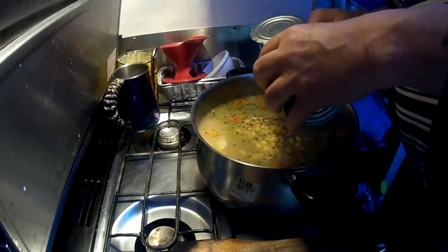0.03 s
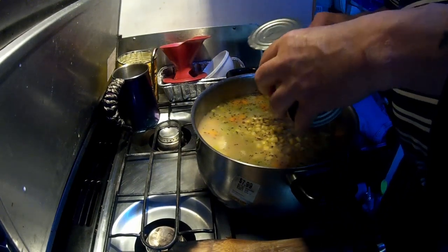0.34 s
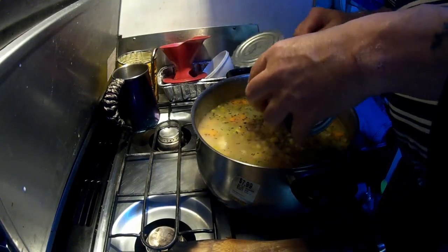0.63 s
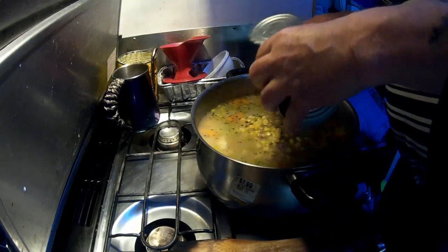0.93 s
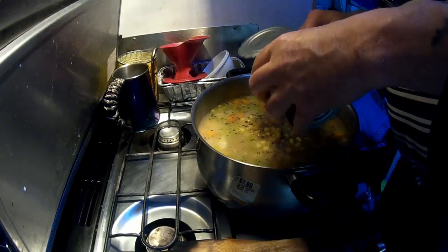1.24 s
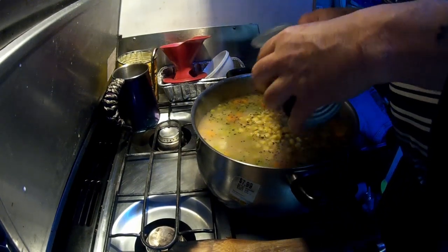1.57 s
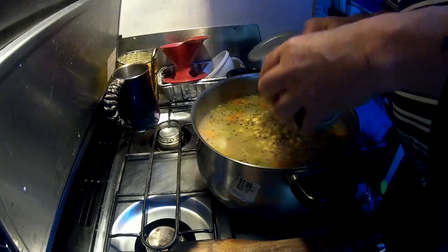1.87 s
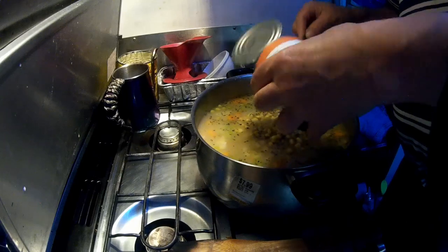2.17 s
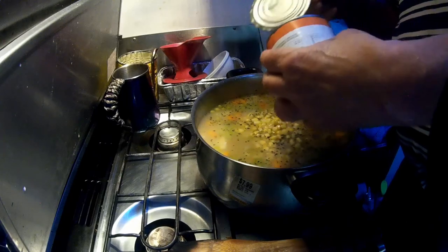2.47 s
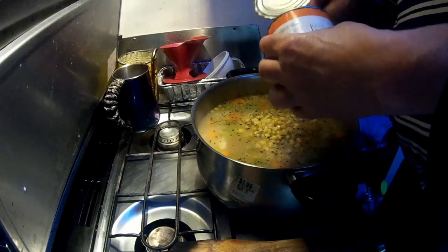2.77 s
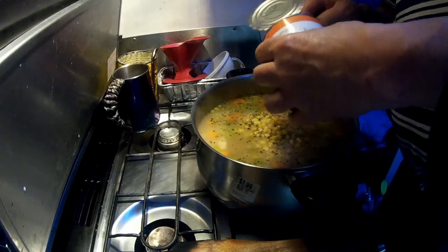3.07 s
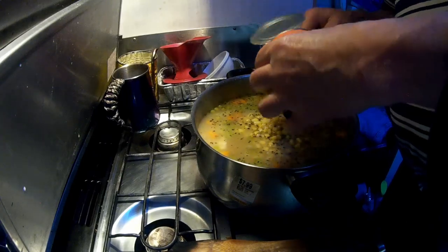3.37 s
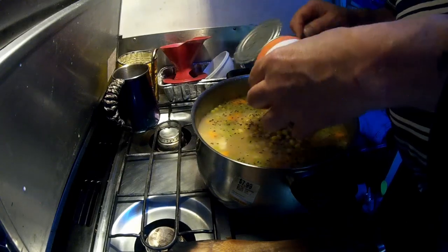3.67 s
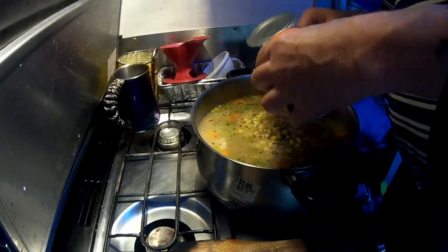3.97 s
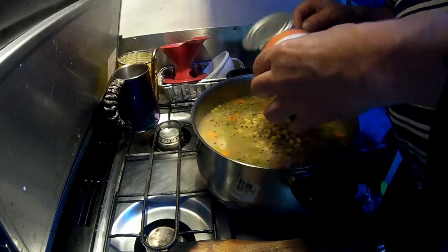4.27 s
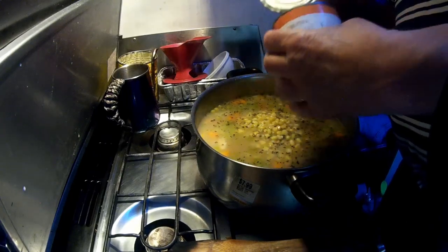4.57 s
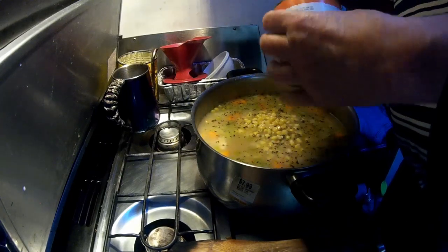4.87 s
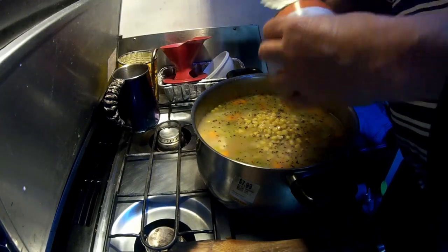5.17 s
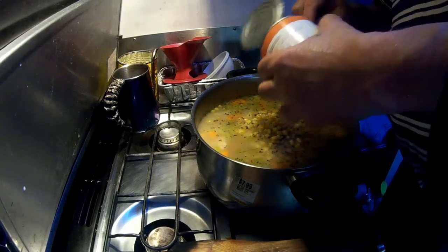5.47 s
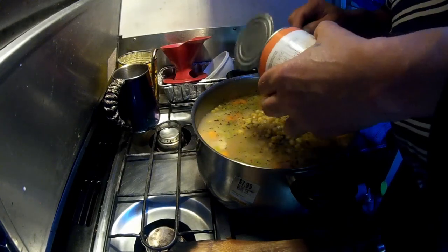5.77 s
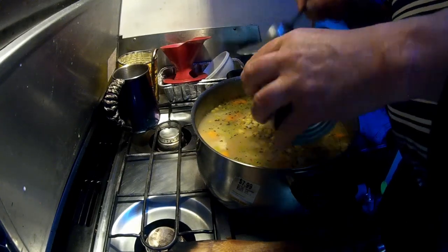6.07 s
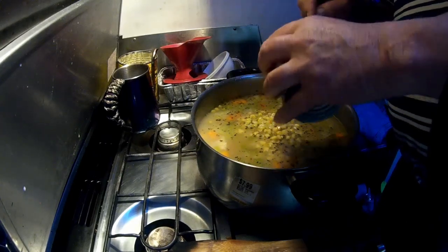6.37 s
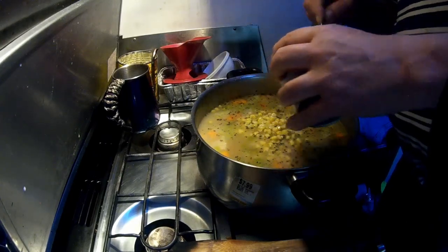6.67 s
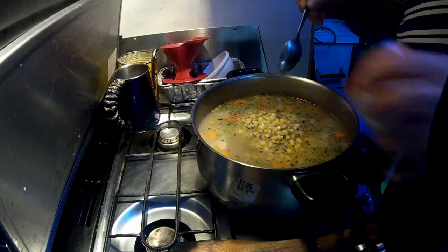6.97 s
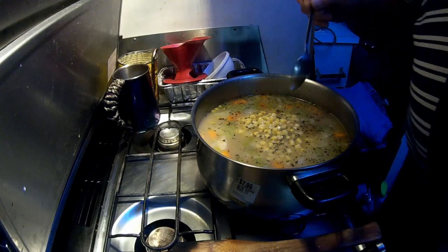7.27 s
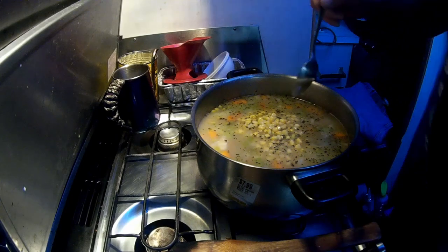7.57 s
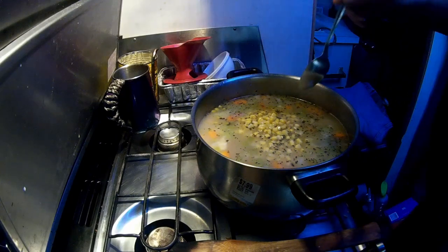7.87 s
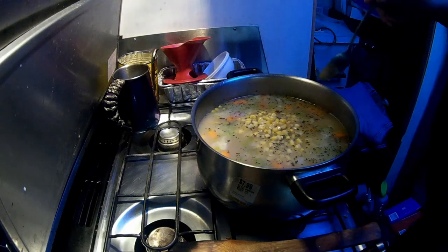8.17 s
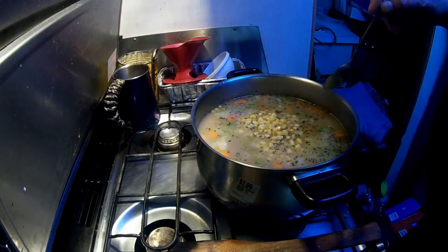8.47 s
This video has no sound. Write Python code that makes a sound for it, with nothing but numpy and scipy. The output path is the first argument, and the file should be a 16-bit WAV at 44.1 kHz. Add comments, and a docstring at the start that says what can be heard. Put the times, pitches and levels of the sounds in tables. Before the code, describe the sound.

A spoon knocks and scrapes inside a tin can over a steel pot, with hollow clacks, brief rings and a low gas burner rumble.

```python
"""A spoon knocks and scrapes in a tin can being emptied over a steel pot of soup in a small kitchen.
The air in the can answers with a short hollow note, lower once the can is empty; the tin clacks and
squeaks, and the pot rings briefly where the can taps or rubs its rim. Heard from one microphone close
to the pot, with a short wash off the near walls and the gas burner rumbling underneath."""
import sys
import numpy as np
from scipy import signal
from scipy.fft import rfft, irfft
from scipy.io import wavfile

SR = 44100
rng = np.random.default_rng(int(sys.argv[2]) if len(sys.argv) > 2 else 0)


def generate_wav(sig):
    """Save sig (samples, or channels by samples) to the path in sys.argv[1] as 16-bit PCM at SR."""
    pcm = np.round(np.clip(np.atleast_2d(sig).T, -1, 1) * 32767).astype(np.int16)
    wavfile.write(sys.argv[1], SR, pcm)


N = 375291
EMPTIED_S = 6.35  # from here on the can is empty and lifted off the rim
SCATTER_DB = 1.2  # spread of mode strength from blow to blow

# Spoon on can and can on pot, close to the microphone:
# (time [s], hollow note peak [dB], note pitch [Hz], clack [dB], rasp [dB], rim strength [dB])
CAN_KNOCKS = [(0.118, -28, 600, -46.5, -40.5, -48.5), (0.163, -32, 576, -52, -54, -56),
              (0.187, -13.5, 697, -29, -48, -74), (0.219, -30, 645, -52, -53, -75),
              (0.276, -38.5, 643, -51, -55.5, -87), (0.584, -35, 595, -43, -57, -49.5),
              (0.855, -17, 613, -36, -38.5, -46), (0.97, -12, 690, -31.5, -55, -58),
              (1.539, -21.5, 618, -41, -40, -46.5), (1.598, -27.5, 636, -48, -58, -47),
              (1.64, -9, 664, -31, -43, -72), (1.682, -23, 630, -50, -50.5, -59),
              (1.893, -29, 600, -53, -51, -42.5), (1.931, -29, 581, -47, -62, -48),
              (1.975, -25, 675, -49, -53, -54), (2.004, -23, 625, -38.5, -49.5, -38),
              (2.75, -39, 630, -62, -41.5, -43), (2.788, -16.5, 735, -37, -41.5, -49),
              (2.81, -26.5, 647, -56, -64, -46), (2.824, -42, 600, -42, -49, -39),
              (3.02, -16.5, 756, -33.5, -45, -77), (3.15, -37, 680, -44, -59, -58),
              (3.18, -33, 620, -50, -52, -79), (3.305, -21, 650, -40, -45, -52),
              (3.309, -12.5, 695, -29, -59, -47), (3.36, -33, 610, -58, -64, -43),
              (3.439, -34.5, 630, -57, -48, -51), (3.574, -29.5, 585, -40, -57.5, -49),
              (3.632, -25.5, 635, -61, -74, -51), (3.673, -27.5, 634, -37.5, -49.5, -45),
              (3.871, -15.5, 628, -44, -36.5, -39), (3.929, -31, 650, -54, -76, -78),
              (3.995, -23, 630, -42.5, -50.5, -59), (4.121, -39, 634, -53, -42, -52),
              (4.131, -27, 613, -47, -40.5, -43), (5.044, -13.5, 618, -29.5, -43.5, -63),
              (5.246, -35.5, 700, -46, -45, -36.5), (5.532, -29, 602, -58, -52, -46),
              (5.599, -30.5, 576, -39.5, -54, -54), (5.627, -27, 592, -38.5, -55, -50),
              (6.299, -17, 664, -33, -35, -42), (6.366, -25.5, 600, -39, -48, -45),
              (6.489, -30.5, 502, -48.5, -68, -54), (6.622, -15.5, 502, -33.5, -42.5, -45),
              (6.675, -23, 547, -43.5, -51, -66), (6.745, -27.5, 565, -60, -57, -51),
              (7.133, -61, 680, -51, -68, -73), (7.877, -11, 506, -33, -42, -74),
              (7.989, -31, 530, -46, -55, -62), (8.454, -44.5, 667, -48, -58, -56)]
def knocks(note_swell_s=0.003, crunch_s=0.0063, chatter_db=-22, chatter_s=0.03):
    """A sharp touch and a few ms of crunch sound the air in the can, the tin and the pot."""
    out, t = np.zeros(N), clock(.1)
    for s, note_db, hz, clack_db, rasp_db, rim_db in CAN_KNOCKS:
        emptied = s > EMPTIED_S
        envelope = np.exp(-(t / crunch_s) ** 2) + from_db(chatter_db) * np.exp(-t / chatter_s)
        force = rng.standard_normal(len(t)) * envelope
        force[0] += 6.3  # the first touch
        tick_db = rasp_db - (16 if emptied else 12)
        add(out, s, from_db(note_db) * damped_note(hz, note_swell_s))
        add(out, s, tin(force, (clack_db, rasp_db, tick_db), contact_samples=353))
        add(out, s, pot_ring(note_db, rim_db, emptied))
    return out


def thuds(swell_s=0.0031, jolt_hz=280, heavy_db=-12.5, full_db=-25, empty_db=-16):
    """Heavy knocks jolt the whole can, more so when empty; the hand damps it within a cycle or two."""
    out = np.zeros(N)
    for s, note_db, *_ in CAN_KNOCKS:
        jolt_db = note_db + min(note_db - heavy_db, 0) + (full_db if s < EMPTIED_S else empty_db)
        add(out, s, from_db(jolt_db) * damped_note(jolt_hz, swell_s))
    return out


# Short-lived resonances of the tin: (frequency [Hz], width [Hz], relative level [dB])
TIN_MODES = [(798.5, 32.8, 28), (978, 58, 14), (1115, 79, 11), (1423, 94, 8.5), (1583, 69, 3.5),
             (1934, 69, -5.5), (2016, 31, -1), (2387, 115, -8), (2455, 45, -4.5), (2730, 88, -0.5),
             (2965, 84, -6), (3457, 130, -8.5), (3680, 61, -12), (4406, 24, -14.5), (4570, 50, -25),
             (5390, 220, -20.5), (5780, 400, -18), (7180, 310, -16), (7850, 93, -16), (9900, 2200, -40.5),
             (13300, 10500, -41.5)]
# The tin's clack, rasp and tick bands: (low edge [Hz], high edge [Hz])
TIN_BANDS = [(850, 1900), (1900, 4500), (4500, 15500)]
def tin(force, band_levels_db, contact_samples):
    """A contact rings the tin, a little differently at each spot; its kind sets each band's level."""
    body = sum((-1) ** k * from_db(db + SCATTER_DB * rng.normal()) * resonate(force, hz, width)
               for k, (hz, width, db) in enumerate(TIN_MODES))
    parts = [(-1) ** k * band(body, edges) for k, edges in enumerate(TIN_BANDS)]
    return sum(from_db(db) * part / rms(part[:contact_samples])
               for part, db in zip(parts, band_levels_db))


# Blows that leave the can's wall free to ring: (time [s], level [dB], tilt [dB/octave])
WALL_BLOWS = [(1.642, -19.5, 0), (3.0195, -18, -2.5), (5.047, -16, -5.5), (6.301, -22, -11)]
# Modes of the can's wall: (frequency [Hz], relative level [dB], t60 [s])
WALL_MODES = [(682, -0.5, 0.033), (642, -4.5, 0.16), (1380, -1.5, .06), (2237, 0, 0.042), (2370, -13, 0.1),
              (2900, -30, .07), (3490, -30.5, 0.13)]
def clangs(rise_s=0.002, snap_db=-33, snap_s=0.0031, snap_hz=8000):
    """A hard edge snaps, and the can's wall swings up and rings on after the clean rebound."""
    out, t = np.zeros(N), clock(.5)
    rise = 1 - np.exp(-(t / rise_s) ** 2)
    for s, db, tilt_db in WALL_BLOWS:
        add(out, s, from_db(db) * struck(WALL_MODES, tilt_db) * rise)
        snap = rng.standard_normal(len(t)) * np.exp(-t / snap_s)
        add(out, s, from_db(db + snap_db) * band(snap, snap_hz, "high"))
    return out


# Spoon strokes inside the can: (start [s], end [s], hollow note [dB], rasp [dB], swell [dB])
SPOON_STROKES = [(0.131, 0.253, -49, -63, 7), (0.429, 0.53, -47, -59, 17), (0.58, 0.638, -47, -64, -1),
                 (0.867, 0.969, -41.5, -55, 16), (0.986, 1.065, -44.5, -68, 0),
                 (1.237, 1.339, -41.5, -57.5, 1), (1.547, 1.661, -35.5, -52, 23),
                 (1.809, 1.872, -37.5, -56, 23), (1.868, 1.946, -39, -52, -1), (1.955, 1.996, -35, -56, 7),
                 (2.759, 2.885, -54, -61, 6), (3.151, 3.201, -45.5, -58.5, -8),
                 (3.342, 3.372, -37, -59, -6), (3.442, 3.524, -45.5, -61.5, -3),
                 (3.549, 3.629, -38, -61, 10.5), (3.879, 3.911, -47, -55, 6), (4.08, 4.135, -40, -53, 8),
                 (4.137, 4.162, -26.5, -48.5, -4), (4.162, 4.234, -42.5, -68, 2),
                 (4.97, 5.041, -34.5, -54, 5), (5.251, 5.337, -51, -60.5, 8),
                 (5.445, 5.561, -40.5, -57.5, 19), (5.609, 5.636, -46, -61, -9),
                 (6.298, 6.365, -34, -47, -19), (6.356, 6.399, -34, -48.5, -14),
                 (6.393, 6.448, -40.5, -78, -7), (6.481, 6.537, -36.5, -67, 4),
                 (6.629, 6.673, -37.5, -59, -23), (6.723, 6.777, -38, -65, -1),
                 (7.906, 8.007, -42.5, -54, 10), (8.107, 8.167, -51.5, -78, 6)]
# Note of the air in the can, dropping as the last food slides out: (time [s], pitch [Hz])
AIR_PITCH = [(0, 607), (2, 619), (4.2, 639), (5.6, 623), (6.33, 640), (6.42, 520), (8.2, 538)]
def scrapes(slips_per_s=700, slip_spread_db=5.0, hiss=0.12, edge_s=0.0056,
            catch_db=1.0, catch_hz=70, air_width_hz=125, steadiness=0.61):
    """Metal drags on metal, bearing down or easing off: slips tick in the tin and keep its air humming."""
    out, t = np.zeros(N), clock(.25)
    for start, end, note_db, rasp_db, swell_db in SPOON_STROKES:
        length = end - start
        samples = int(length * SR)
        contact = np.clip(np.minimum(t, length - t) / edge_s, 0, 1)
        push = from_db(swell_db * np.minimum(t / length, 1))
        slipping = rng.random(len(t)) < slips_per_s / SR
        slips = slipping * from_db(slip_spread_db * np.minimum(rng.exponential(1, len(t)), 3))
        friction = slips * rng.choice([-1, 1], len(t)) + hiss * rng.standard_normal(len(t))
        # the edge catches and lets go, so the grit comes in clumps
        catches = band(rng.standard_normal(SR // 2), catch_hz, "low")[-len(t):]
        grit = friction * from_db(catch_db * catches / rms(catches))
        hz = np.interp(start + length / 2, *np.transpose(AIR_PITCH))
        air = resonate(resonate(grit, hz, air_width_hz), hz, air_width_hz)
        # steady pressure evens out the beating of the note
        beating = np.abs(signal.hilbert(air)) + rms(air) / 10
        air = contact * push * air / beating ** steadiness
        add(out, start, from_db(note_db) * air / rms(air[:samples]))
        clack_db = 0.4 * note_db + 0.6 * rasp_db - 0.5
        tick_db = rasp_db - 19
        add(out, start, tin(contact * push ** 0.87 * grit, (clack_db, rasp_db, tick_db), samples))
    return out


# Short metal tones, squeaks of the tin and a brief ring of the pot:
# (start [s], end [s], start pitch [Hz], end pitch [Hz], level [dB])
METAL_TONES = [(0.942, 0.976, 2900, 2950, -55), (.975, 1.001, 826, 924, -32.5),
               (1.013, 1.029, 2460, 2230, -48), (2.788, 2.802, 1126, 1080, -27),
               (2.792, 2.816, 2440, 2220, -39), (3.018, 3.031, 1408, 1414, -26.5),
               (3.311, 3.324, 1042, 910, -24), (3.316, 3.351, 2470, 2140, -47.5),
               (3.354, 3.399, 2130, 2130, -47), (4.148, 4.217, 2650, 2660, -57),
               (5.043, 5.051, 2130, 2220, -25.5), (5.046, 5.056, 846, 710, -20.5),
               (6.62, 6.64, 3410, 3420, -49)]
def metal_tones(waver=0.014, waver_hz=260):
    """The tin squeaks or the pot rings for a moment: a wavering tone that glides or holds its pitch."""
    out = np.zeros(N)
    for start, end, from_hz, to_hz, db in METAL_TONES:
        samples = len(clock(end - start))
        wobble = band(rng.standard_normal(SR // 2), waver_hz, "low")
        pitch = np.linspace(from_hz, to_hz, samples) * (1 + waver * wobble[-samples:] / rms(wobble))
        tone = np.sin(2 * np.pi * np.cumsum(pitch) / SR)
        add(out, start, from_db(db) * signal.windows.tukey(samples, .5) * tone)
    return out


# The pot just under the can, two families of modes set off at different places on its rim:
# (frequency [Hz], relative level [dB], t60 [s])
POT_LOW_MODES = [(634, 2.5, 0.15), (965.5, -1, 0.23), (1023, -16, 0.36)]
POT_HIGH_MODES = [(1430, -1, 0.22), (1670, -39, 0.49), (2070, -27.5, 0.15), (2500, -16.5, .2),
                  (2570, -23.5, 0.17), (3720, -25, 0.13)]
def pot_ring(note_db, rim_db, lifted, lifted_db=-20, gain_db=1.5):
    """One knock rings the steel pot; the low modes are much weaker once the can is off the rim."""
    low_db = -16 + 0.32 * note_db + 0.38 * rim_db + lifted_db * lifted
    ring = from_db(low_db) * struck(POT_LOW_MODES) + from_db(rim_db) * struck(POT_HIGH_MODES)
    return from_db(gain_db) * ring


# The can's edge rubbing along the pot's rim: (start [s], end [s], level [dB])
RIM_RUBS = [(2.75, 2.8, -39.5), (2.828, 2.869, -62), (3.335, 3.375, -47), (5.247, 5.343, -51.5)]
def rubs(pressed_width_hz=30):
    """Friction feeds the pot's upper modes while the pressing edge damps them."""
    out, t = np.zeros(N), clock(.25)
    for start, end, db in RIM_RUBS:
        touching = t <= end - start
        friction = rng.standard_normal(len(t)) * touching
        ring = sum(from_db(mode_db) * resonate(friction, hz, pressed_width_hz)
                   for hz, mode_db, _ in POT_HIGH_MODES)
        add(out, start, from_db(db) * ring / rms(ring[touching]))
    return out


# The pot's thin, long modes, faint even this close: (frequency [Hz], relative level [dB], t60 [s])
POT_THIN_MODES = [(1420, -4.5, 0.63), (1484, -11, 0.51), (1710, -8, 0.32), (1754, -2, 0.74),
                  (2530, -12.5, 0.58), (2360, -9.5, 0.64)]
def pot_afterring(resting_db=-70, free_db=-61, follows_force=0.14, usual_knock_db=-24):
    """Every knock stirs the pot's thin modes, which sing out once nothing rests on the rim."""
    out = np.zeros(N)
    for s, note_db, *_ in CAN_KNOCKS:
        ring_db = (resting_db if s < EMPTIED_S else free_db) + follows_force * (note_db - usual_knock_db)
        add(out, s, from_db(ring_db) * struck(POT_THIN_MODES))
    return out


def kitchen(x, t60=0.21, wet_db=-16, dull_hz=3500, first_echo_s=0.0085):
    """Near walls and the steel splashback return a short, dull wash to the microphone."""
    t = clock(.5)
    echoes = band(rng.standard_normal(len(t)), dull_hz, "low")
    echoes *= np.exp(-np.log(1000) * t / t60) * (t > first_echo_s)
    echoes /= np.sqrt(np.sum(echoes ** 2) * SR / (2 * dull_hz))  # about unit gain below dull_hz
    return x + from_db(wet_db) * signal.fftconvolve(x, echoes)[:N]


# Gas burner below the pot, with the room tone: (frequency [Hz], relative spectral density [dB])
BURNER_SPECTRUM = [(25, 0.5), (45, -5.5), (85, 0.5), (120, -6), (165, -5.5), (230, -13), (420, -16),
                   (700, -20), (860, -18.5), (1050, -22.5), (1550, -25), (2400, -36.5), (4500, -40.5),
                   (15000, -41)]
# The burner's hum and whistle: (frequency [Hz], width [Hz], level [dB])
BURNER_TONES = [(104, 5.7, -65.5), (842, 12, -69)]
def burner(level_db=-53, low_cut_hz=34):
    """The flame rumbles with a faint hum and whistle, its treble sinking into even hiss."""
    hz, db = np.transpose(BURNER_SPECTRUM)
    bin_hz = np.maximum(np.fft.rfftfreq(N, 1 / SR), 1)
    shape = from_db(np.interp(np.log(bin_hz), np.log(hz), db))
    rumble = band(irfft(rfft(rng.standard_normal(N)) * shape, N), low_cut_hz, "high")
    out = from_db(level_db) * rumble / rms(rumble)
    for tone_hz, width, tone_db in BURNER_TONES:
        tone = resonate(resonate(rng.standard_normal(N), tone_hz, 2 * width), tone_hz, 2 * width)
        out += from_db(tone_db) * tone / rms(tone)
    return out


def damped_note(hz, swell_s):
    """A heavily damped note that builds over a cycle or two and dies."""
    t = clock(.1)
    return t / swell_s * np.exp(1 - t / swell_s) * np.sin(2 * np.pi * hz * t)


def struck(modes, tilt_db=0):
    """Decaying modes, each with a slightly different strength on every blow."""
    out, t = 0, clock(.5)
    for hz, db, t60 in modes:
        strength = from_db(db + tilt_db * np.log2(hz / modes[0][0]) + SCATTER_DB * rng.normal())
        out += strength * np.exp(-np.log(1000) * t / t60) * np.sin(2 * np.pi * hz * t)
    return out


def resonate(x, hz, width):
    """Two-pole resonance with gain 1 at its peak."""
    r = np.exp(-np.pi * width / SR)
    feedback = [1, -2 * r * np.cos(2 * np.pi * hz / SR), r * r]
    return signal.lfilter(np.array([1, 0, -1]) * (1 - r * r) / 2, feedback, x + 1e-18)


def band(x, edges, kind="band"):
    return signal.sosfilt(signal.butter(2, edges, kind, fs=SR, output="sos"), x)


def from_db(db):
    return 10 ** (np.asarray(db) / 20)


def rms(x):
    return np.sqrt(np.mean(x ** 2) + 1e-20)


def clock(seconds):
    return np.arange(int(seconds * SR)) / SR


def add(track, s, sound):
    """Mix a sound into the track at s seconds."""
    at = int(s * SR)
    track[at:at + len(sound)] += sound[:max(N - at, 0)]


def scene():
    """Can and pot close to one microphone, the burner underneath."""
    metal = knocks() + thuds() + clangs() + pot_afterring() + scrapes() + rubs() + metal_tones()
    return (kitchen(metal) + burner())[None]


def record(dry, cutoff_hz=15400):
    """The microphone's signal is cut steeply at the top."""
    return signal.sosfilt(signal.ellip(10, .1, 70, cutoff_hz, fs=SR, output="sos"), dry)


dry = scene()
out = record(dry)
generate_wav(out)
```